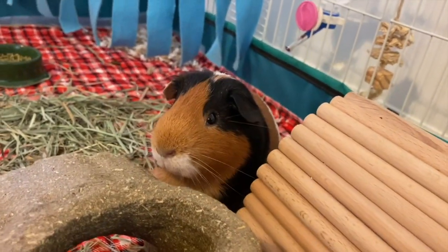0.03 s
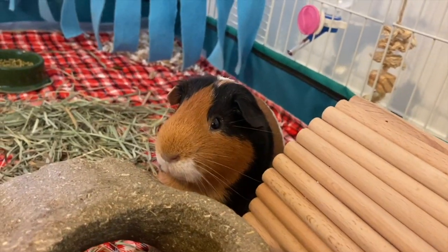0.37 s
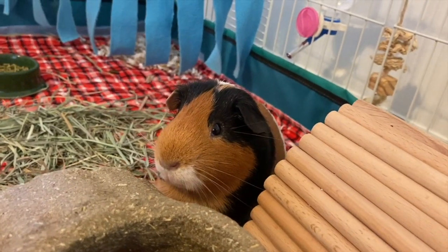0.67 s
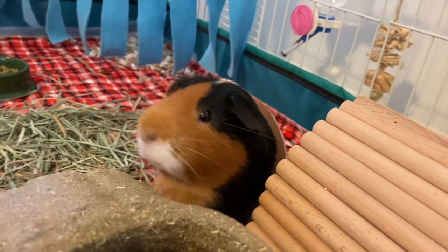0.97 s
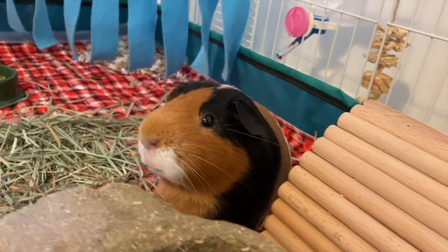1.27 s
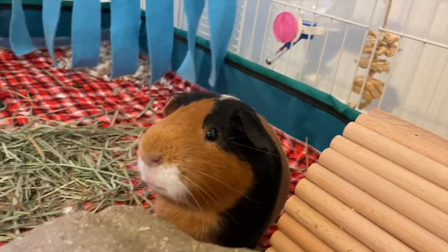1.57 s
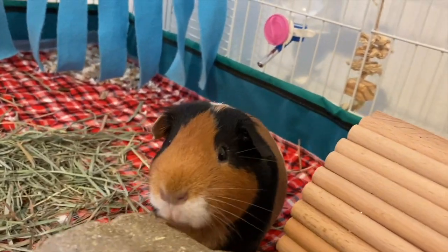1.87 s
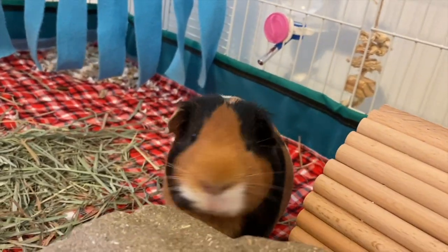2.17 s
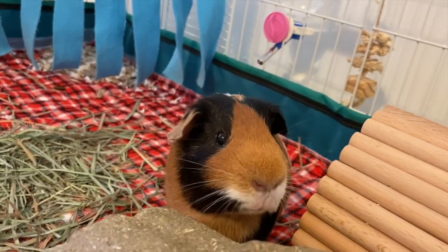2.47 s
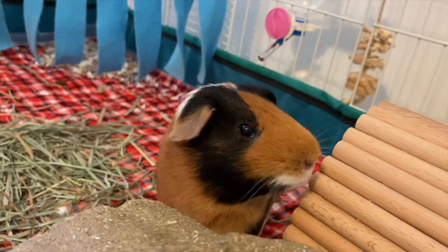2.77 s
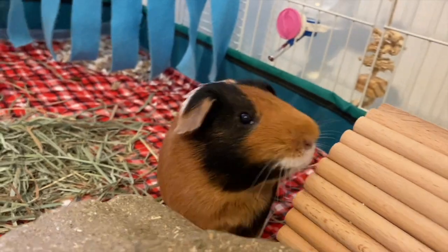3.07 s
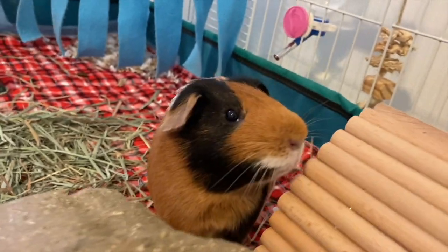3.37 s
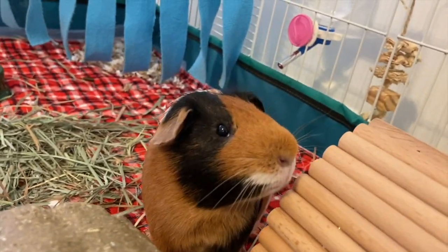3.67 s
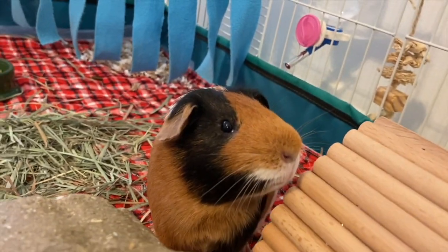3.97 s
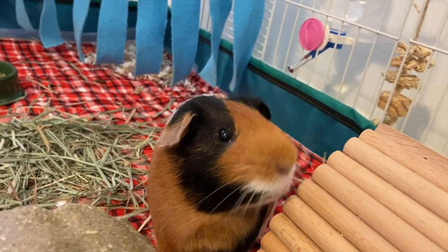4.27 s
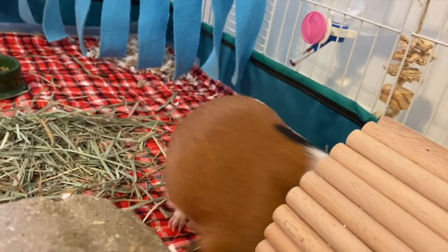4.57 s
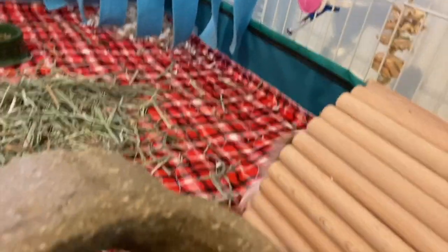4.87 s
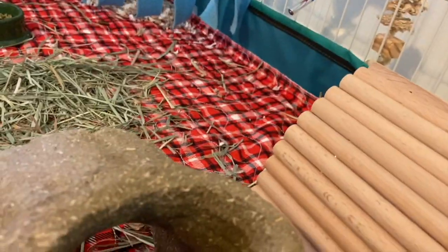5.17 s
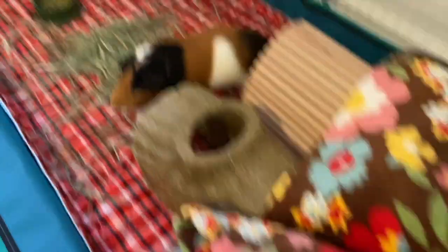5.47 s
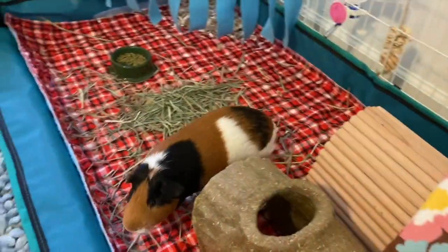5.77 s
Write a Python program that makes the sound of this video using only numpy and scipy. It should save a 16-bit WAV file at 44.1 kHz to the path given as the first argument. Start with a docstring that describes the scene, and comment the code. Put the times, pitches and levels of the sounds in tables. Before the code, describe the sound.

Short, buzzy chuts come one after another from a guinea pig in a padded pen indoors, many breaking upward into thin squeaks. High squeals cluster at the start, and a raspy one climbs later on before quieter calls finish. Hay ticks, fleece rustles lightly and paws shuffle, while the close, hand-held microphone picks up a low rumble and a few dull bumps.

```python
"""A guinea pig in its pen

A guinea pig calls from a fleece-lined pen in a quiet room, close to a hand-held microphone.
Its vocal folds buzz and its throat shapes the buzz into short, low, reedy calls ("chuts").
Many flip up through a rough break into a thin squeal. Bedding rustles and ticks, paws shuffle,
something taps lightly in the pen, and the hand holding the microphone adds a soft rumble."""
import sys
import numpy as np
from scipy import signal
from scipy.fft import rfft, irfft
from scipy.io import wavfile
from scipy.ndimage import uniform_filter1d

SR = 44100
rng = np.random.default_rng(int(sys.argv[2]) if len(sys.argv) > 2 else 0)


def unload_wav(signal):
    """Save mono or channel-first audio to the path in sys.argv[1] as 16-bit WAV at rate SR, clipped to [-1, 1]."""
    wavfile.write(
        sys.argv[1],
        SR,
        np.round(np.clip(np.atleast_2d(signal).T, -1, 1) * 32767).astype(np.int16),
    )


N = 257544
TIME = np.arange(N) / SR
CUTOFF_HZ = 15900
RELEASE_S = 0.007   # how long the voice takes to switch off

# the mouth opens wide for the last squeal: time_s, opening (0 to 1), upper_resonance_hz
MOUTH_OPENING = [(4.2, 0.1, 2600), (4.235, 0.6, 2750), (4.28, 0.77, 3560), (4.385, 0.8, 5240),
                 (4.4, 0.03, 5300)]
# dull bumps: start_s, thump_db, knock_db
DULL_BUMPS = [(.116, -37, -46), (0.169, -32, -56), (4.311, -29, -41), (5.355, -29.5, -34)]


def from_db(db):
    """Turn decibels into a number to multiply by."""
    return 10 ** (np.asarray(db) / 20)


def rms_one(x):
    """Scale a sound to an average power of 1."""
    return x / np.sqrt(np.mean(x ** 2) + 1e-20)


def in_time(rows, t=TIME):
    """Join each column of a table with straight lines over time."""
    times, *columns = np.transpose(rows)
    return [np.interp(t, times, column) for column in columns]


def at_hz(points, hz, column=1):
    """Read a table between its frequencies, giving every octave equal room."""
    table = np.array(points)
    return np.interp(np.log(hz + 1e-9), np.log(table[:, 0]), table[:, column])


def low_pass(x, hz):
    """Gently dull everything above a frequency."""
    return signal.sosfilt(signal.butter(2, min(hz, SR / 3), fs=SR, output="sos"), x + 1e-18)


def drift(hz, size=N):
    """Random wavering up to about a given rate, with a typical size of 1."""
    return rms_one(low_pass(rng.standard_normal(size + SR // 10), hz)[SR // 10:])


def coloured(colour, likeness):
    """Stereo noise with a given tone colour; a likeness of 1 makes left and right the same."""
    gain = from_db(at_hz(colour, np.fft.rfftfreq(N, 1 / SR)))
    mid, side = irfft(rfft(rng.standard_normal((2, N))) * gain, N)
    alike = np.clip(likeness, -1, 1)
    return rms_one(np.sqrt(1 + alike) * mid + np.sqrt(1 - alike) * side * [[1], [-1]])


def decays(events, fade_s, rise_s):
    """Loudness curve of small hits (start_s, level_db); each dies away by 60 dB in fade_s."""
    out = np.zeros(N)
    age = TIME[:SR // 2]
    for start, db in events:
        first = max(int(start * SR), 0)
        hit = from_db(db - 60 * age / fade_s) * (1 - np.exp(-age / rise_s))
        out[first:first + len(age)] += hit[:N - first]
    return out


def gate(t, start, end, edge_s):
    """One between start and end, zero outside, with short ramps."""
    return np.clip(np.minimum(t - start, end - t) / edge_s + .5, 0, 1)


def voicing(start, end, attack_s):
    """Sample positions, times and on-off ramp for one stretch of voice."""
    at = np.flatnonzero((TIME > start - attack_s / 2) & (TIME < end + RELEASE_S / 2))
    t = TIME[at]
    return at, t, np.clip(np.minimum((t - start) / attack_s, (end - t) / RELEASE_S) + .5, 0, 1)


def mouth(hz, t, peak_db=19.5, width_octaves=0.35):
    """How many dB the throat boosts a frequency; its upper resonance slides up as the mouth opens."""
    # the throat with the mouth half closed, then wide open: frequency_hz, gain_db
    half_closed = [(500, 1.5), (1050, 10.5), (1740, -4.5), (2100, 3.5), (2600, 2), (3300, -2), (3850, -8.5),
                   (4150, -29), (4550, -29.5), (5100, -2), (6400, 1), (7300, -13), (8800, -14.5),
                   (12200, -8.5), (14000, -16.5)]
    wide_open = [(700, 9.5), (1150, 24), (1900, -3.5), (5200, 2), (7000, -37), (15000, -8)]
    opening, upper_hz = in_time(MOUTH_OPENING, t)
    resonance_db = peak_db * np.exp(-(np.log2((hz + 1) / upper_hz) / width_octaves) ** 2)
    return (1 - opening) * at_hz(half_closed, hz) + opening * (at_hz(wide_open, hz) + resonance_db)


def through_mouth(x, start):
    """Pass a sound through the changing throat, one short slice at a time."""
    hz, age, slices = signal.stft(x, SR, nperseg=512)
    return signal.istft(slices * from_db(mouth(hz[:, None], start + age)), SR)[1][..., :x.shape[-1]]


def breath(t, phase, rasp, squeal, air_db=-36, rasp_db=-15, open_db=-5, hiss_db=-29):
    """Air puffs out with each beat of the folds, most in a rough, open-mouthed call; squeals hiss."""
    opening, _ = in_time(MOUTH_OPENING, t)
    rush = through_mouth(rng.standard_normal(len(t)), t[0])
    strength = from_db(air_db) + rasp * (from_db(rasp_db) + opening * from_db(open_db))
    puffs = rms_one(rush * (1 + .5 * np.cos(phase))) * strength
    hiss = rms_one(np.gradient(rush)) * from_db(hiss_db) * squeal
    return puffs + hiss


def call(t, hz, octave_db, bright_db, fall_db_per_octave=9, pitch_wobble=0.018, huskiness=0.083):
    """The vocal folds buzz along a pitch curve, making a stack of tones that the throat shapes."""
    # voice breaks and husky stretches: start_s, end_s, half_pitch_db, rasp (0 to 1)
    breaks = [(0, 0.109, -8, 0.05), (0.375, 0.402, 1.5, 0.27), (0.406, 0.508, -10.5, 0.11),
              (0.771, 0.828, 1.5, 0.31), (1.148, 1.167, -5, 0.21), (2.531, 2.565, -9, 0.03),
              (2.873, 2.898, -1, 0.18), (4.185, 4.252, -0.5, 0.13), (4.246, 4.354, 3.5, 0.76),
              (4.619, 4.648, -1, 0.16), (5.322, 5.359, -14, 0.6), (5.541, 5.58, -4, 0.27),
              (5.79, 5.8, -23, 0)]
    # where the snout points: time_s, direction (plus is left, minus is right)
    snout = [(2.6, 1.03), (2.85, 0.39), (4.25, 0.84), (4.55, -1.2), (5.1, -0.91), (5.6, 1.84)]
    # the two microphone openings at direction 1: frequency_hz, left_louder_db, left_ahead_radians
    mic_openings = [(510, 2.5, 0.47), (950, 1.5, 1.08), (2130, 6, 1.16), (6000, 2.5, 0.17)]
    start, size = t[0], len(t)
    direction, = in_time(snout, t)
    # at a break the folds repeat every second beat, adding half-pitch tones, and beat unevenly
    split = sum(gate(t, a, b, 0.0035) * from_db(db) for a, b, db, _ in breaks)
    split *= 1 + 0.5 * drift(54, size)
    rasp = sum(gate(t, a, b, 0.0087) * amount for a, b, _, amount in breaks)
    rasp += 0.43 * np.exp(-abs(t - start) / 0.0039)   # they also start unevenly
    phase = 2 * np.pi * np.cumsum(hz * (1 + pitch_wobble * drift(310, size))) / SR
    phase += rasp * drift(190, size)
    low_voice = np.interp(hz, [700, 950], [1, 0])
    squeal = np.interp(hz, [1100, 1600], [0, 1])
    opening, _ = in_time(MOUTH_OPENING, t)
    folds, power = np.zeros((2, size)), 0
    for k in np.arange(1, 25) / 2:   # 0.5, 1, 1.5 ... times the pitch
        tone_hz = k * hz
        db = -fall_db_per_octave * abs(np.log2(k)) - max(k - 5, 0) + (k == 2) * octave_db * low_voice
        db += (k > 1) * bright_db * (1 - opening) * np.interp(tone_hz, [1200, 1700], [0, 1])
        db -= 7 * (1 - squeal) * np.interp(tone_hz, [2900, 3500], [0, 1])   # slack folds sound duller
        gain = from_db(db) * (tone_hz < CUTOFF_HZ)
        flutter = 1 + (huskiness * k + 0.31 * rasp) * drift(470, size)
        smear = 0
        if k % 1:   # half-pitch tones stand out more high up, and rasp smears them
            gain *= split * from_db(2 * np.log2(k))
            smear = 1.8 * rasp * drift(160, size) + rng.uniform(0, 2 * np.pi)
        pan_db = direction * at_hz(mic_openings, tone_hz)
        lead = direction * at_hz(mic_openings, tone_hz, column=2)
        stereo = np.array([from_db(side * pan_db) * np.exp(1j * side * lead) for side in (.5, -.5)])
        folds += gain * flutter * np.real(stereo * np.exp(1j * (k * phase + smear)))
        power += abs(gain * from_db(mouth(tone_hz, t)) * stereo.mean(0)) ** 2
    buzz = through_mouth(folds, start) * np.sqrt(2 / power)   # keeps the power near 1
    return buzz + breath(t, phase, rasp, squeal)


def high_squeal(curve, bright_db):
    """A thin squeal warbles up and down in the high voice."""
    at, t, ramp = voicing(curve[0][0], curve[-1][0], attack_s=RELEASE_S)
    hz, level_db = uniform_filter1d(np.array(in_time(curve, t)), size=220, axis=1, mode="nearest")
    return at, ramp * from_db(level_db) * call(t, hz, 0, bright_db)


def guinea_pig():
    """Place every squeal and chut at its time."""
    # one curve for each squeal, made of points: time_s, pitch_hz, level_db
    squeals = [
        [(0.0, 1645, -35), (.015, 1883, -40.5), (.038, 1507, -36.5), (.075, 1880, -38), (.092, 1612, -39.5),
         (.125, 2190, -35.5), (.151, 1260, -41)],
        [(.408, 1230, -52), (.418, 1655, -39.5), (.452, 1944, -40.5), (.473, 1195, -33), (.517, 1837, -41.5),
         (.528, 1710, -44.5)],
        [(.802, 1350, -32), (.81, 1637, -42), (.835, 2100, -39), (.853, 2170, -36), (.873, 2984, -35.5),
         (.887, 3150, -68)],
        [(2.084, 1535, -46), (2.097, 1254, -31.5), (2.132, 1020, -34.5), (2.146, 1080, -41)],
        [(2.872, 950, -36.5), (2.884, 809, -33.5), (2.896, 1163, -33.5), (2.908, 1302, -29),
         (2.918, 886, -35.5)],
        [(4.25, 1139, -38), (4.29, 1849, -38), (4.332, 2095, -41), (4.35, 1850, -49.5), (4.392, 2600, -46.5),
         (4.4, 2740, -38), (4.426, 2624, -37), (4.437, 2280, -45)],
    ]
    # overtone boost for each squeal: bright_db
    brightness = [6, 6.5, 4.5, 9.5, -6.5, -7]
    # low calls: start_s, length_s, first_hz, settled_hz, swell_s, level_db, octave_db, bright_db
    chuts = [(0.315, 0.11, 666, 485.7, 0.039, -31, 2.5, 4.5),
             (0.721, 0.079, 588.6, 503.6, 0.039, -30, 2.5, 3.5),
             (1.08, 0.1, 712, 487.7, 0.022, -33.5, -1, 0), (1.485, 0.045, 616, 567, 0.078, -36.5, 0.5, 3),
             (1.736, 0.044, 745, 514.6, 0.053, -32.5, 0, 6.5), (1.989, 0.11, 681, 517, 0.033, -35, 2.5, 9),
             (2.173, 0.032, 875, 516, 0.008, -40.5, 6, 12.5),
             (2.362, 0.061, 748, 473.7, 0.046, -33, 8, 11.5),
             (2.432, 0.024, 749, 825, 0.011, -35.5, -7, -5), (2.495, 0.13, 710, 596.5, 0.18, -29.5, 6, 4.5),
             (2.783, 0.096, 701, 496.4, 0.042, -28, 8.5, 1),
             (3.115, 0.046, 679, 460.5, 0.029, -28, 5.5, -0.5),
             (3.43, 0.029, 582, 490.5, 0.032, -31.5, 3, -4.5),
             (3.736, 0.024, 568, 563, 0.017, -36.5, 3, -14),
             (4.082, 0.055, 606, 625, 0.13, -25.5, 4.5, -4.5), (4.173, .014, 818, 675, 0.0042, -26, 3, -2),
             (4.179, 0.075, 700, 576, 0.031, -28, 2, -3), (4.565, 0.076, 641, 542, 0.029, -29, -12.5, -50),
             (4.71, 0.058, 887, 706, 0.016, -37.5, -4, 0), (4.859, 0.086, 612, 495, 0.027, -41, 0.5, -14),
             (5.055, 0.06, 560, 479, 0.012, -50, 1.5, -32), (5.269, 0.038, 623, 451, 0.016, -45, -18, -14),
             (5.3, 0.051, 556, 543, 0.017, -40, -1.5, -6), (5.472, 0.1, 613.5, 504, 0.037, -37.5, -1, -7),
             (5.702, 0.095, 590, 539, 0.024, -38, 1.5, -5.5)]
    out = np.zeros((2, N))
    for at, sound in [chut(*row) for row in chuts] + list(map(high_squeal, squeals, brightness)):
        out[:, at] += sound
    return out


def room(x, dull_hz=2600, fade_s=0.23):
    """A short wash of echoes, dulled by soft furnishings."""
    age = TIME[:SR // 2]
    tail = low_pass(rng.standard_normal((2, len(age))), dull_hz)
    tail *= from_db(-60 * age / fade_s) * (age > .004)
    return signal.fftconvolve(x.mean(0)[None], tail / np.sqrt(np.sum(tail ** 2) / 2), axes=1)[:, :N]


def room_air(level_db=-58.5):
    """The faint, steady hush of the room."""
    # its tone colour: frequency_hz, gain_db
    colour = [(60, 9.5), (1000, -18.5), (8000, -52)]
    return from_db(level_db) * coloured(colour, likeness=0.42)


def movement(rise_db_per_s=478, fall_db_per_s=151.5):
    """Rustle, shuffle and rumble levels in dB: each move builds fast, holds and dies away more slowly."""
    # the animal and the hand move: start_s, length_s, rustle_db, shuffle_db, rumble_db
    moves = [(0.091, 0.044, -66, -55.5, -42), (0.553, 0.012, -50, -43.5, -41.5),
             (1.277, 0.52, -56, -65, -84), (1.707, 0.012, -50.5, -56, -74), (1.921, 0.33, -56.5, -76, -77),
             (2.553, 0.15, -54, -61, -72), (2.705, 0.48, -77.5, -58.5, -60), (3.257, 0.044, -76, -49, -82),
             (3.717, 0.093, -70, -61, -50.5), (3.909, 0.91, -62, -53, -48), (3.99, 0.65, -54.5, -79, -77),
             (4.125, 0.15, -49.5, -50, -52), (4.641, 0.081, -48.5, -54, -60),
             (4.817, 0.33, -104, -63, -47.5), (5.315, 0.11, -58, -50, -45.5),
             (5.457, 0.52, -71, -59, -54.5)]
    # the pen is never quite still: rustle_db, shuffle_db, rumble_db
    resting = [-73.5, -67.5, -61]
    power = from_db(resting)[:, None] ** 2
    for start, length, *levels_db in moves:
        shape_db = np.minimum(rise_db_per_s * (TIME - start), fall_db_per_s * (start + length - TIME))
        power = power + np.outer(from_db(levels_db), from_db(np.clip(shape_db, -100, 0))) ** 2
    return 10 * np.log10(power)


def bedding(rustle_db):
    """Fleece and hay fibres brush together in tiny grains and uneven swells."""
    # tone colour of the rustle: frequency_hz, gain_db
    colour = [(300, -9.5), (1000, 4), (6000, 0.5), (8000, -4), (12000, -8.5), (16000, -15.5)]
    return from_db(rustle_db + 0.6 * drift(140) + drift(24)) * coloured(colour, likeness=0.29)


def paws(shuffle_db, pats_per_s=28, pat_boost_db=11, pat_spread_db=3):
    """Paws shuffle and knock on the padded floor, with random pats that follow the shuffle's level."""
    # tone colour of the shuffle: frequency_hz, gain_db
    colour = [(100, 8.5), (550, 6.5), (1100, -8), (2400, -11.5), (10000, -55.5)]
    knocks = decays([(s, db) for s, _, db in DULL_BUMPS], fade_s=0.043, rise_s=0.0013)
    shuffle = from_db(shuffle_db + 2.5 * drift(44))
    hits = np.flatnonzero(rng.random(N) < pats_per_s / SR)
    pat_db = shuffle_db + pat_boost_db + pat_spread_db * rng.standard_normal(N)
    pats = decays(zip(TIME[hits], pat_db[hits]), fade_s=0.018, rise_s=0.00065)
    return (shuffle + knocks + pats) * coloured(colour, likeness=0.28)


def handling(rumble_db, bump_hz=59, bump_boost_db=1):
    """The hand rumbles on the microphone's case; each bump rings for a few low cycles."""
    # tone colour of the rumble: frequency_hz, gain_db
    colour = [(25, -40), (55, -1.5), (150, -15), (1000, -65.5)]
    rumble = from_db(rumble_db) * coloured(colour, likeness=0.98)
    thumps = decays([(s, db + bump_boost_db) for s, db, _ in DULL_BUMPS], fade_s=0.12, rise_s=0.002)
    return rumble + thumps * np.sin(2 * np.pi * bump_hz * TIME)


def chut(start, length, first_hz, settled_hz, swell_s, level_db, octave_db, bright_db,
         settle_s=0.01395, swell_db=10.5, ring_hz=964):
    """A low call slides onto its pitch as it swells; it may then flip up into the high voice."""
    # jumps into the high voice: middle_s, top_hz, rise_s, level_db (before the losses below)
    flips = [(0.396, 1666, 0.017, -24), (0.791, 1610, 0.014, -21), (1.151, 879, 0.014, -34.5),
             (2.061, 1518, 0.015, -26), (2.567, 1363, 0.021, -30), (2.853, 1005, 0.008, -28.5),
             (4.12, 1072, 0.0071, -20.5), (4.216, 1113, 0.0088, -24), (4.63, 1112, 0.0152, -27.5),
             (4.927, 804, 0.015, -36), (5.342, 1648, 0.018, -27), (5.559, 1578, 0.022, -29),
             (5.782, 1195, 0.014, -34)]
    at, t, ramp = voicing(start, start + length, attack_s=0.001)
    age = t - start
    hz = settled_hz + (first_hz - settled_hz) * np.exp(-age / settle_s)
    off_peak = np.minimum((age / swell_s - 1) ** 2, 1)
    pop_db = 2 * np.exp(-abs(age) / 0.0013)   # the folds open with a small pop
    loudness = from_db(level_db - swell_db * off_peak + pop_db)
    for middle_s, top_hz, rise_s, flip_db in flips:
        if start < middle_s < start + length:
            high = .5 + .5 * np.tanh((t - middle_s) / rise_s)   # S-shaped rise from 0 to 1
            hz = hz + high * (top_hz - hz)
            fade_db = 10 * np.exp((age - length) / 0.0058)
            off_ring_db = 18.5 * abs(np.log2(hz / ring_hz))   # loudest on the throat's main resonance
            loudness = (1 - high) * loudness + high * from_db(flip_db - fade_db - off_ring_db)
    return at, ramp * loudness * call(t, hz, octave_db, bright_db)


def hay_snaps():
    """Dry stalks snap with tiny, bright ticks."""
    # the snaps: start_s, level_db
    ticks = [(2.097, -39), (2.2315, -46), (2.265, -42.5), (2.7045, -44.5), (2.833, -49.5), (2.9745, -50)]
    # their tone colour: frequency_hz, gain_db
    colour = [(2000, -20), (7000, 1), (11000, 4.5)]
    return decays(ticks, fade_s=0.013, rise_s=0.00022) * coloured(colour, likeness=0.14)


def taps(fade_s=0.023, scrape_db=-9):
    """Light taps in the pen: each is a short woody ring with a little scrape."""
    # the taps: start_s, pitch_hz, level_db
    hits = [(2.258, 1390, -37), (2.704, 1050, -38.5), (2.975, 1210, -46), (5.381, 475, -30)]
    # tone colour of the scrape: frequency_hz, gain_db
    colour = [(1300, -3), (12000, -34)]
    scrape = from_db(scrape_db) * coloured(colour, likeness=0.42)
    return sum(decays([(s, db)], fade_s, rise_s=0.0003) * (np.sin(2 * np.pi * hz * (TIME - s)) + scrape)
               for s, hz, db in hits)


def scene(voice_db=0.26, echo_db=-22):
    """Mix the animal, its pen, the hand and the quiet room."""
    voice = from_db(voice_db) * guinea_pig()
    rustle_db, shuffle_db, rumble_db = movement()
    air = room_air()
    echo = from_db(echo_db) * room(voice)
    pen = bedding(rustle_db) + paws(shuffle_db) + hay_snaps() + taps()
    return voice + echo + pen + handling(rumble_db) + air


def widen(x, from_hz=6850, turn_span_hz=4450, linger=0.41):
    """Both sides share one treble signal, which swings in and out of step as the frequency rises."""
    hz = np.fft.rfftfreq(N, 1 / SR)
    left, right = rfft(x)
    shared = np.clip((hz - from_hz) / 1000 + 1, 0, 1)
    turn = 2 * np.pi * np.maximum(hz - from_hz, 0) / turn_span_hz
    twisted = left * np.exp(1j * (turn - linger * np.sin(2 * turn)))
    return irfft(np.array([left, (1 - shared) * right + shared * twisted]), N)


def record(dry, low_cut_hz=36):
    """The microphone widens the treble, thins the deepest bass and cuts off the very top."""
    thinned = signal.sosfilt(signal.butter(2, low_cut_hz, "high", fs=SR, output="sos"), widen(dry))
    return signal.sosfilt(signal.ellip(10, .2, 70, CUTOFF_HZ, fs=SR, output="sos"), thinned)


dry = scene()
out = record(dry)
unload_wav(out)
```